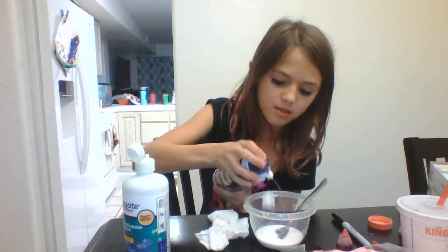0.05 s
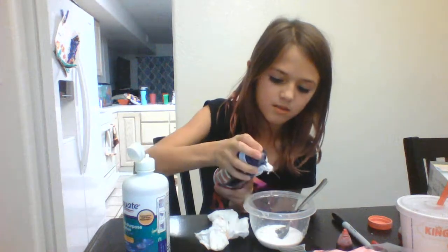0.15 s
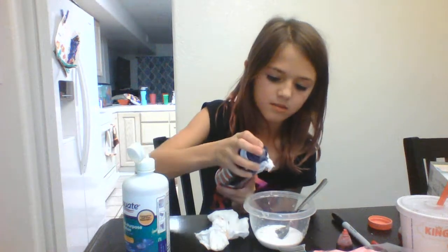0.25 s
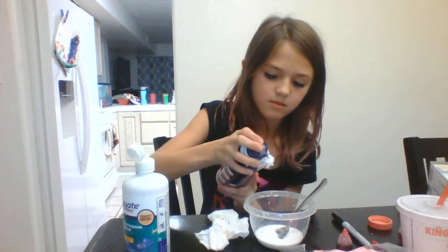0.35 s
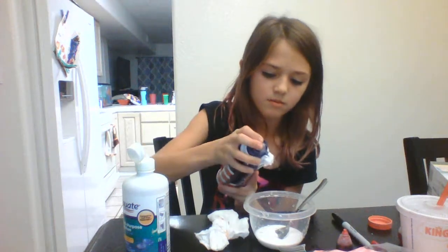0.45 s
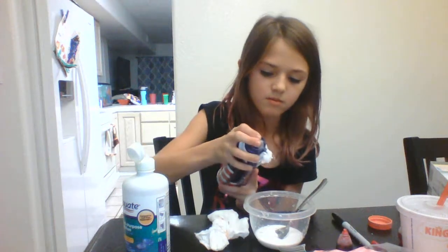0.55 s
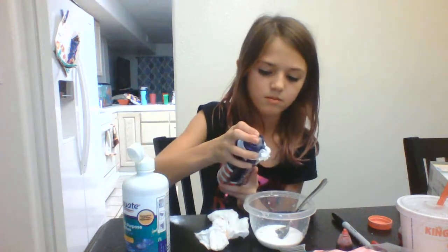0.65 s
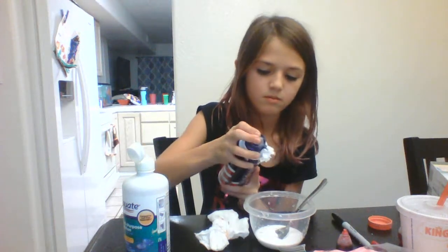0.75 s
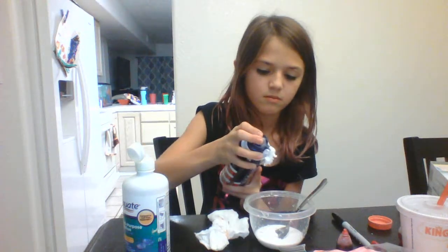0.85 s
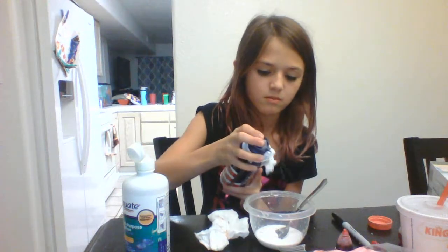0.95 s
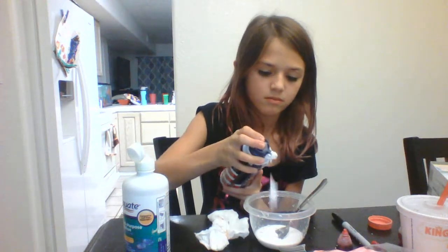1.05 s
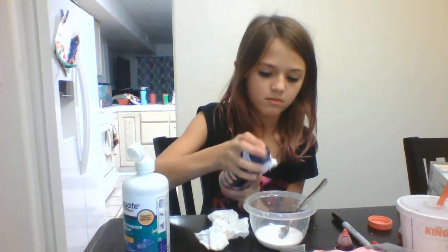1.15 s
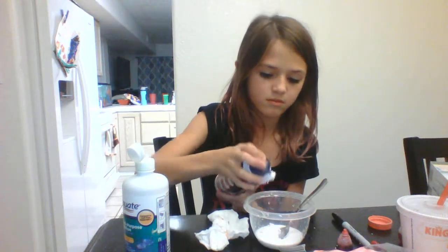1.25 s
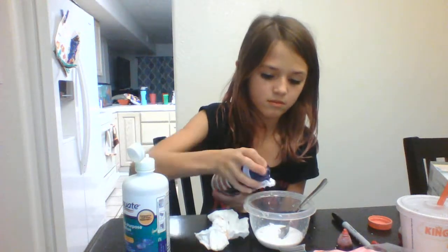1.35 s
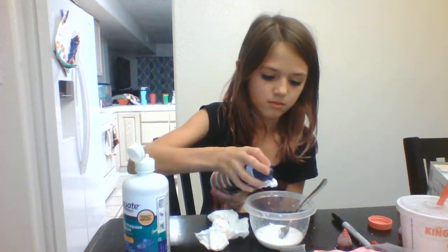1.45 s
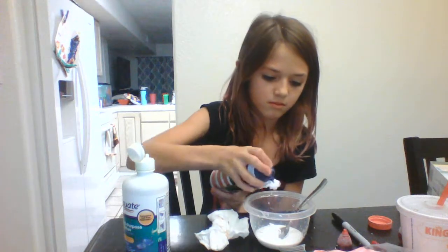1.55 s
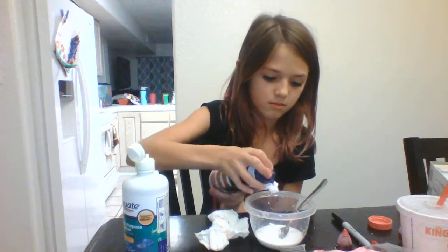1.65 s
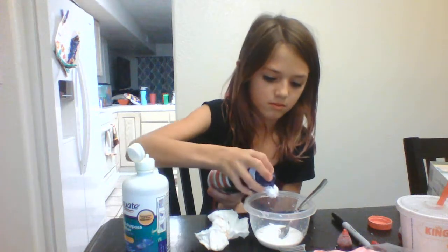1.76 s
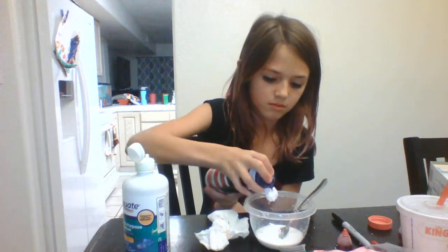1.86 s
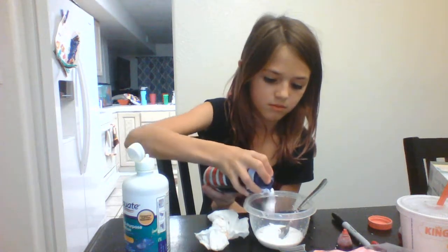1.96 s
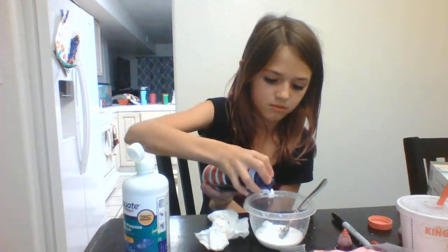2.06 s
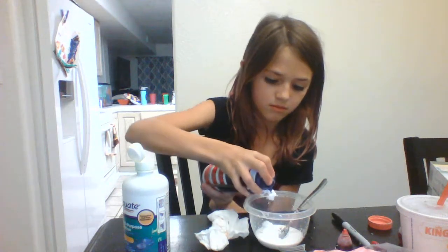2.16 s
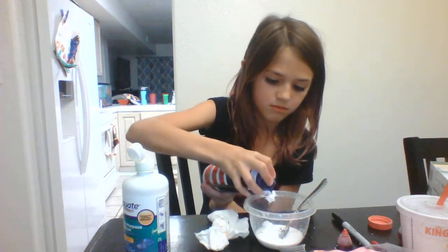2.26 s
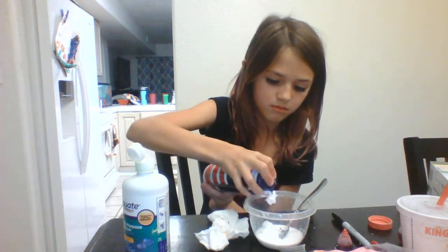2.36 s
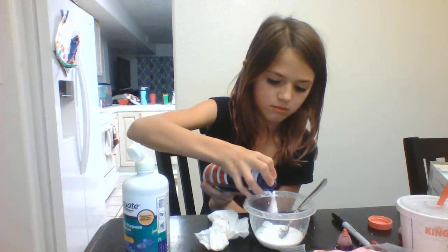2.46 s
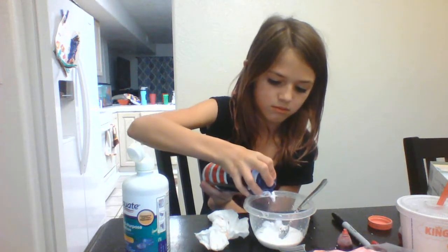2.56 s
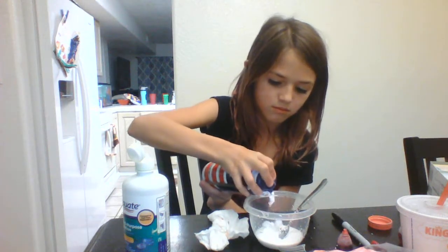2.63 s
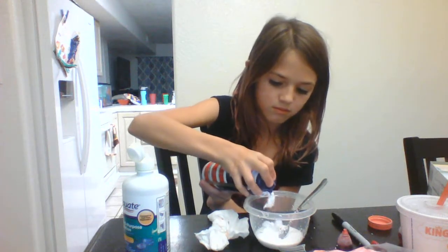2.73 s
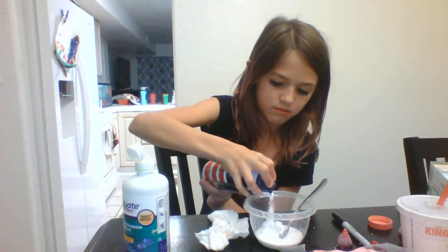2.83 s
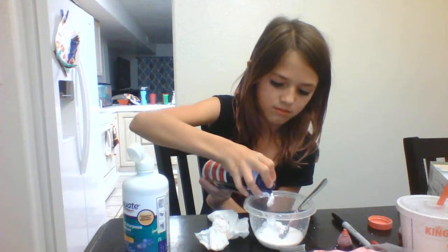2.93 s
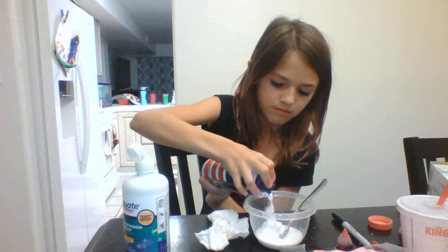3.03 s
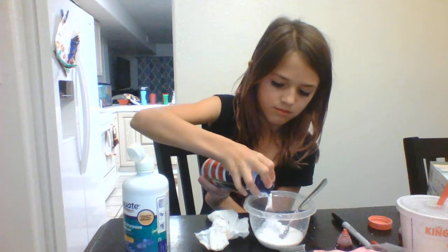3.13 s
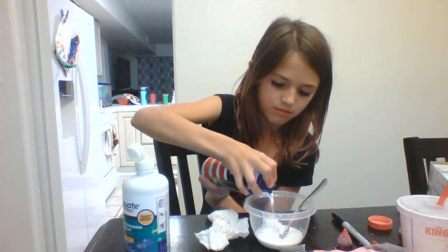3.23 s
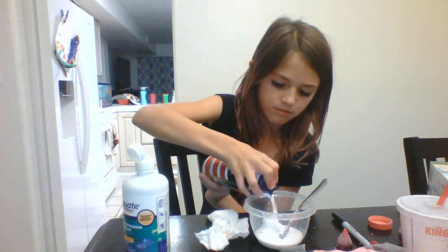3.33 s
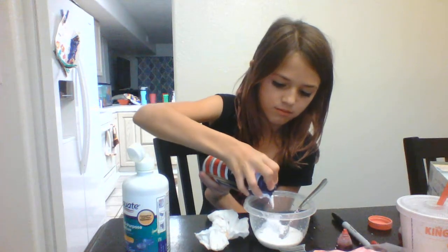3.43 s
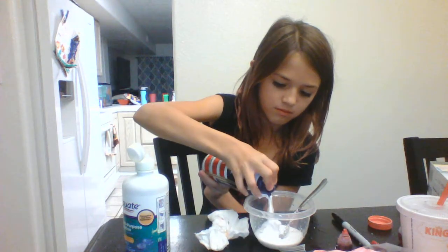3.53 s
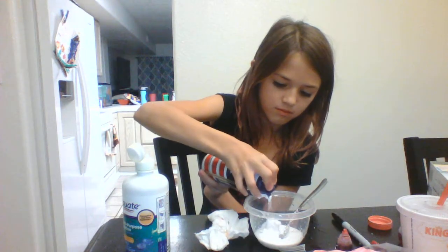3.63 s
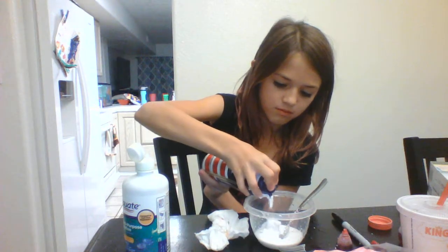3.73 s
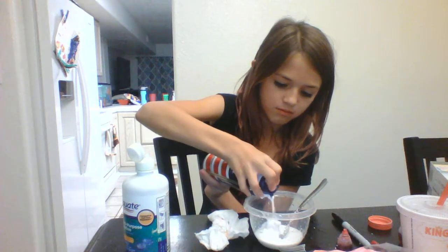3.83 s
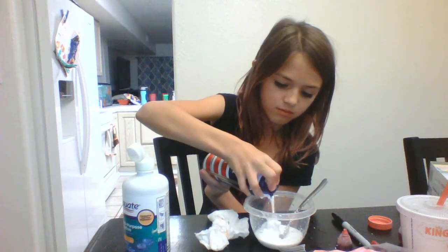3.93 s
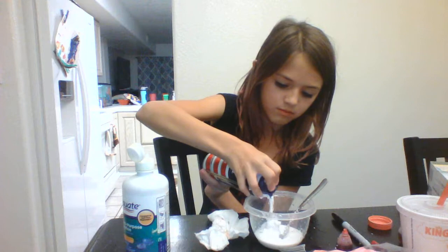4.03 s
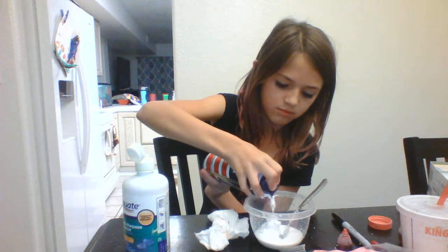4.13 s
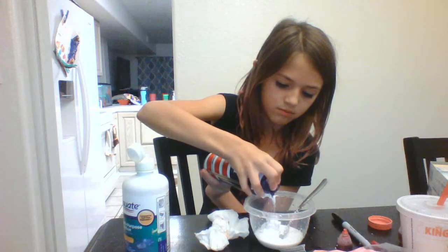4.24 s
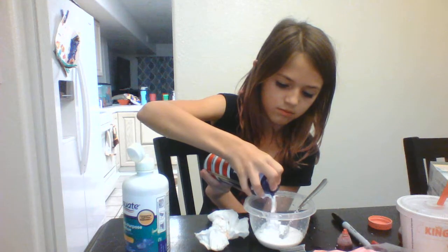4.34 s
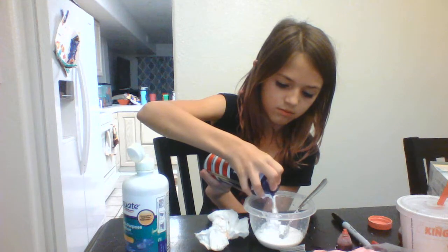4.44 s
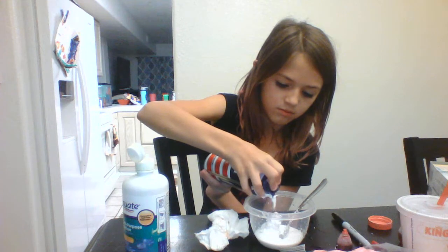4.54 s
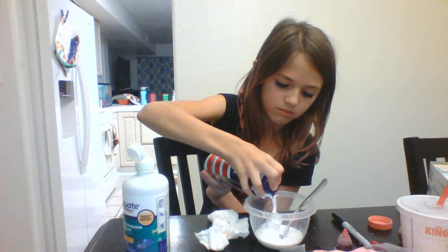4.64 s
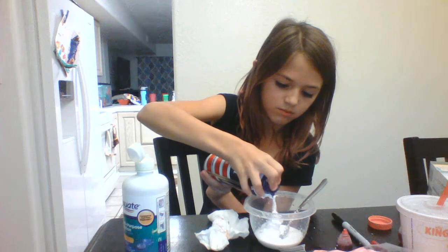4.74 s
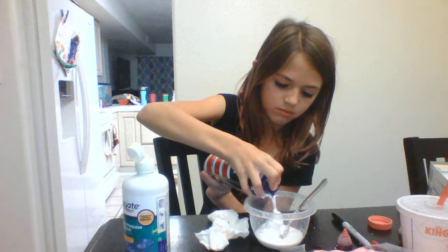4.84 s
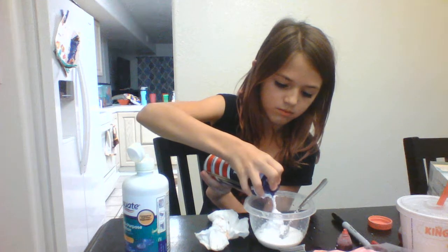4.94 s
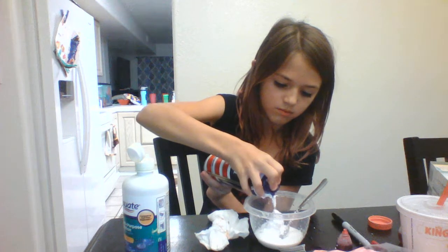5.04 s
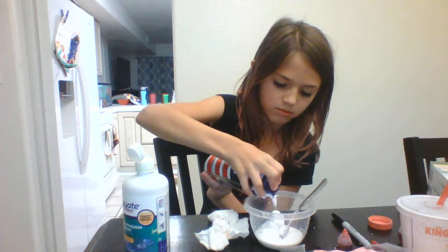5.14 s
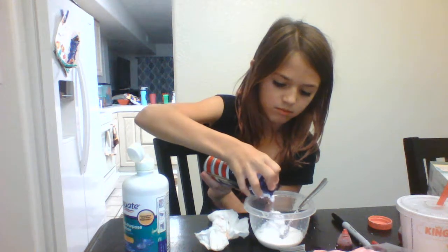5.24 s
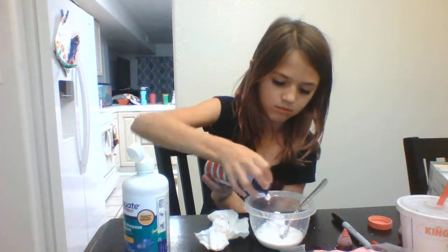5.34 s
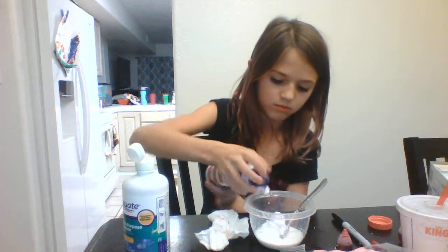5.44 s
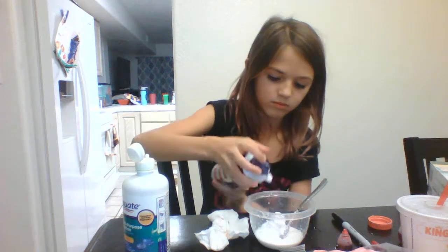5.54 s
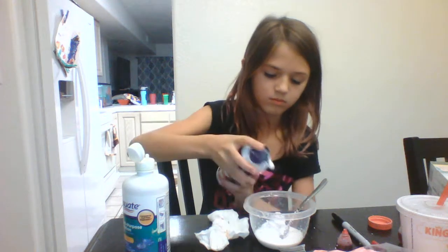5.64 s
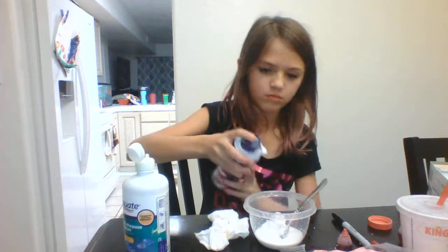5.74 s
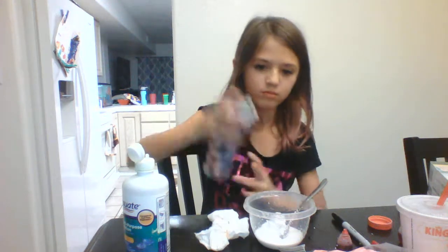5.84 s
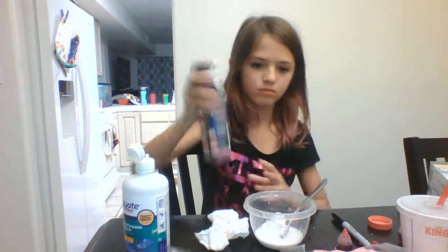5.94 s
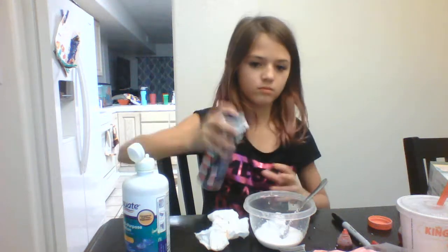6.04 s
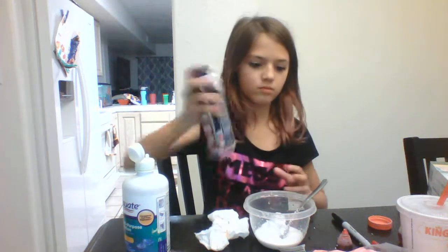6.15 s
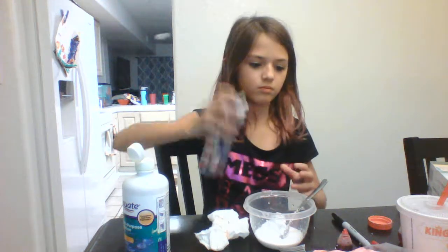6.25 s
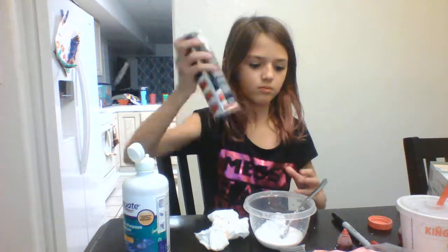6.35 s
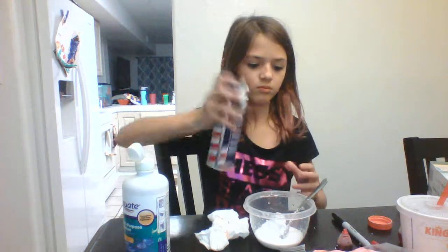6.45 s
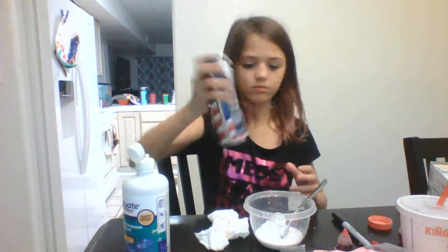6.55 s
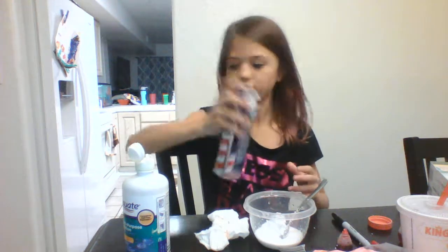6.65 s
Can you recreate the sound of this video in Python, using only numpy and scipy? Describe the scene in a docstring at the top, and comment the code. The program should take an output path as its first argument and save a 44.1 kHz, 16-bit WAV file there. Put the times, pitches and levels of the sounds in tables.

```python
"""A spurt of gas and foam sputters from a can into a plastic bowl and dies away; a second, long one stops short
and rings out in the kitchen. Bursting noise excites the resonances of spout and bowl; pockets of gas pop at their
own pitch and tearing foam spits bright cracks. The table top, near a laptop microphone, sends a close echo whose
notch sinks in the first spurt and rises later as the can is lowered. Appliances hum behind."""
import sys
import numpy as np
from scipy import signal
from scipy.fft import rfft, irfft, next_fast_len
from scipy.io import wavfile
from scipy.ndimage import uniform_filter1d, map_coordinates

SR = 44100
rng = np.random.default_rng(int(sys.argv[2]) if len(sys.argv) > 2 else 0)


def unload_audio(sound):
    """Save the sound as a 16-bit wav file, at the path given as the first command line argument."""
    columns = np.transpose(np.atleast_2d(sound))
    # keep every value between -1 and 1, then stretch to whole-number steps
    steps = np.round(np.clip(columns, -1, 1) * 32767)
    wavfile.write(sys.argv[1], SR, steps.astype(np.int16))


N = 294676
TIME = np.arange(N) / SR


def amp(db):
    """Decibel law: a level in dB becomes an amplitude gain."""
    return 10 ** (np.asarray(db) / 20)


def unit(x):
    """Normalization: the signal is scaled to rms 1."""
    return x / np.sqrt(np.mean(x ** 2) + 1e-20)


def along(points, hz):
    """Interpolation of (Hz, value) points on a logarithmic frequency axis."""
    point_hz, values = np.transpose(points)
    return np.interp(np.log(hz + 1), np.log(point_hz + 1), values)


def curves(rows):
    """Linear interpolation in time: one curve for each column after the time."""
    seconds, *columns = np.transpose(rows)
    return [np.interp(TIME, seconds, column) for column in columns]


def wobble(rate):
    """Band-limited random fluctuation: a smooth curve through rate random knots a second."""
    return map_coordinates(rng.standard_normal(N // 20), [TIME * rate])


def filtered(x, response):
    """Linear filtering: the spectrum of x times a complex response of frequency."""
    size = next_fast_len(N + SR // 2)
    spectrum = rfft(x, size) * response(np.fft.rfftfreq(size, 1 / SR))
    return irfft(spectrum, size)[..., :N]


def modes(table):
    """Modal superposition: damped resonances of alternating sign add up."""
    def response(f):
        total = 0
        for k, (centre, width, db) in enumerate(table):
            damping = 1j * f * width
            total = total + (-1) ** k * amp(db) * damping / (centre * centre - f * f + damping)
        return total
    return response


def steep(table):
    """Cascaded resonators: the modal response squared, so its skirts are steeper and its dB doubled."""
    return lambda f: modes(table)(f) ** 2


def bursts(fast_db, slow_db):
    """Intermittent flow: level in dB of millisecond bursts in clumps, saturating at 11 dB."""
    level_db = fast_db * wobble(450) + slow_db * (wobble(120) + 0.53 * wobble(40))
    return 11 * np.tanh(level_db / 11)


# the gas flow, one table per spurt: start_s, flow_db, foam (0-1, foam in the spout),
# lean_db (upper whistle over lower), mids_db, treble_db
SPURTS = [
    [(0.0, -33.5, 0.16, -10, -4, 2), (.15, -40.5, 0.03, -12.5, -2.5, 0), (.38, -42.5, 0, -12.5, -2, 1.5),
     (.62, -45, 0, -2, 0.5, -1.5), (.73, -40, .1, 17, -5, 2.5), (.8, -46.5, 0.14, 10, 0, 3.5),
     (1.14, -49.5, 0.05, -0.5, -4, 3), (1.24, -55, 0.11, -1, 1.5, 8), (1.47, -51.5, 0.16, -1, 2, 2)],
    [(1.49, -55, 0.3, 0, 7, 2), (1.5, -41.5, 0.34, 5, 0, -5), (1.59, -35, 0.06, 2.5, -2, 3),
     (1.74, -35, 0.55, -9, 3, -0.5), (1.8, -32, 0.33, -13.5, 2.5, -4), (1.96, -32, 0.6, -12, -2.5, -3),
     (2.16, -33, 0.43, -8, 1.5, 1), (2.4, -33.5, 0.63, -2.5, 1.5, -3), (2.6, -28, 0.75, 2, 1.5, 0),
     (2.75, -27.5, .9, -2.5, 3, -1), (2.9, -28.5, .9, -1, 1, 4.5), (3.15, -25.5, 0.92, -3.5, 2, -2),
     (3.35, -28, 1, 0, 0.5, 4.5), (3.55, -28.5, .9, -1.5, 0, -1), (3.85, -30, 0.75, 5, -0.5, 6.5),
     (4.1, -26, 0.8, 1, -6, 0), (4.3, -28.5, 0.86, 3, -1.5, -3), (4.55, -29, 0.78, 1.5, -0.5, 0.5),
     (4.8, -29, 0.71, 0.5, -3, 1.5), (5.05, -30.5, 0.67, 9.5, 0.5, 3.5), (5.22, -32.5, 0.82, -0.5, -2.5, 4)],
]
# how the flow divides among the sounds: clear_db (spout clear), foam_db (spout full of foam), re the flow
FLOW_SHARE = {"bowl": (-10.5, -13.5), "hollow": (-2, -22.5), "spout": (-5.5, -15), "lower": (-10.5, -4.5),
              "upper": (-13, -5), "fizz": (-22.5, -16), "air": (-27.5, -21.5)}
# resonances: centre_hz, width_hz, level_db (all but the bowl's are squared in steep)
HOLLOW_MODES = [(1667, 420, 0.5), (1990, 230, 2.5), (2500, 250, -3), (3650, 350, -0.5), (5750, 350, -4),
                (6380, 300, -6.5)]
SPOUT_MODES = [(2080, 170, 1), (2442, 320, 2), (2676, 357, 1), (3265, 250, -0.5)]
LOWER_WHISTLE = [(3663, 460, -4), (4282, 330, 4.5), (4720, 350, -0.5)]
UPPER_WHISTLE = [(5107, 560, 15), (6000, 410, 3.2)]
BOWL_MODES = [(316, 300, -5.5), (732, 92, 3), (1019, 179, 4.5), (1329, 226, 0)]
FIZZ_MODES = [(5850, 565, 0.6), (7480, 1300, 1), (9250, 690, -1)]
# spectral shape of the airy hiss: pitch_hz, relative density_db (per Hz)
AIR_SHAPE = [(6000, -42), (9500, -8), (10500, -3.5), (12100, -8), (13000, -11.5), (14500, -11),
             (15700, -21)]
# uneven flow: shared by the surging resonances, and each one's own
SURGE_DB, OWN_SURGE_DB, SURGES_PER_S = 0.7, 1.2, 11
VALVE_SHUTS_S, CLOSING_DB_PER_S = 5.205, 244.5


def sputter():
    """Resonance under turbulent excitation: partly common bursts drive all modes; foam damps the hollow ones."""
    flow_db, foam, lean_db, mids_db, treble_db = curves(np.vstack(SPURTS))
    common_db = bursts(fast_db=7.5, slow_db=2.0)
    shared_db = flow_db + SURGE_DB * wobble(SURGES_PER_S)

    def share_db(name):
        clear_db, foam_db = FLOW_SHARE[name]
        return clear_db + foam * (foam_db - clear_db)

    def jet(common_part, own_db):
        level_db = common_part * common_db + bursts(own_db, 0.5 * own_db)
        return amp(level_db) * rng.standard_normal(N)

    def gain(db, hz):
        return amp(db + shared_db + OWN_SURGE_DB * wobble(SURGES_PER_S)) + rush(hz)

    hollow = unit(filtered(jet(0.8, 2.1), steep(HOLLOW_MODES)))
    spout = unit(filtered(jet(0.59, 4.0), steep(SPOUT_MODES)))
    lower = unit(filtered(jet(0.906, 3.7), steep(LOWER_WHISTLE)))
    upper = unit(filtered(jet(1.0, 3.5), steep(UPPER_WHISTLE)))
    surging = gain(share_db("hollow"), 2070) * hollow
    surging += gain(share_db("spout") + mids_db, 3030) * spout
    surging += gain(NOZZLE_DB, NOZZLE_HZ) * nozzle(jet)
    surging += gain(share_db("lower") - lean_db / 2, 4350) * lower
    surging += gain(share_db("upper") + lean_db / 2, 5210) * upper

    flicker_db = treble_db + 2.5 * wobble(14)
    bowl = unit(filtered(jet(0.65, 1.5), modes(BOWL_MODES)))
    fizz = unit(filtered(jet(0.419, 6.9), steep(FIZZ_MODES)))
    air = unit(filtered(jet(0.5, 8.6), lambda f: amp(along(AIR_SHAPE, f))))
    even = amp(share_db("bowl") + 0.6 * mids_db) * bowl
    even += amp(share_db("fizz") + flicker_db) * fizz
    even += amp(share_db("air") + 0.8 * flicker_db) * air

    closing = amp(-CLOSING_DB_PER_S * np.clip(TIME - VALVE_SHUTS_S, 0, None))
    return closing * (surging + amp(flow_db) * even)


# spectral shape of rumble and hiss: pitch_hz, relative density_db (per Hz)
FLOOR_SHAPE = [(20, -37), (45, -27), (70, -31), (100, -11), (140, -9.5), (330, -15.5), (390, -17),
               (520, -25.5), (750, -24.5), (850, -35), (1250, -35.5), (1800, -30.5), (2400, -36.5),
               (2900, -40.5), (3700, -36.5), (9000, -36), (15800, -35)]
# hum lines: pitch_hz, drift_hz, waver_db, level_db (at mid-scene, before the waver)
HUM_LINES = [(59.4, 4.4, 2.8, -71), (88.4, 3, 2.5, -58), (109.7, 3.6, 2.8, -63.5), (209, 3, 3, -65.5),
             (289.6, 2.7, 2.8, -69.5), (353, 1.7, 2.5, -60.5), (420, 2.2, 2.5, -73.5), (737, .3, 0.3, -71),
             (14730, 1.2, 2, -84)]
# swells of a faint tone: middle_s, length_s, level_db
TONE_SWELLS = [(1.67, .2, -56), (2.3, 0.15, -73), (3.62, 0.096, -53), (3.976, 0.12, -60),
               (4.24, .25, -54.5), (5.12, 0.34, -47), (5.77, 0.073, -60), (5.95, 0.15, -58.5),
               (6.198, .2, -59), (6.593, 0.086, -60.5)]
FLOOR_DB, HUM_GROWS_DB_PER_S = -57.5, 0.13
SWELL_HZ, SWELL_DRIFT_HZ, SWELL_REST_DB = 243.3, 2.5, -69.5


def background():
    """Stationary noise plus tonal lines: appliance rumble, microphone hiss and hums that waver a little."""
    def line(hz, drift_hz, waver_db):
        cycles = np.cumsum(hz + drift_hz * wobble(8.2)) / SR
        return amp(waver_db * wobble(15)) * np.sin(2 * np.pi * cycles)

    noise = filtered(rng.standard_normal(N), lambda f: amp(along(FLOOR_SHAPE, f)))
    hum = sum(amp(db) * line(hz, drift_hz, waver_db) for hz, drift_hz, waver_db, db in HUM_LINES)
    growth = amp(HUM_GROWS_DB_PER_S * (TIME - TIME.mean()))
    swell = amp(SWELL_REST_DB)
    for middle, length, db in TONE_SWELLS:
        swell = swell + amp(db) * np.exp(-(2 * (TIME - middle) / length) ** 2)
    tone = swell * line(SWELL_HZ, SWELL_DRIFT_HZ, waver_db=2.4)
    return amp(FLOOR_DB) * unit(noise) + growth * hum + tone


# the loudest bursts: start_s, level_db (envelope peak), pitch_hz
GAS_POPS = [(0.0028, -28, 2210), (0.008, -36, 4480), (0.0217, -35, 4590), (0.03, -22, 4240),
            (0.0484, -38, 4430), (0.0614, -32.5, 2290), (0.1007, -30.5, 2240), (0.1113, -28.5, 1960),
            (0.1252, -31.5, 2100), (0.1448, -31, 2170), (0.1934, -26, 1820), (0.2175, -26.5, 2250),
            (0.3114, -30, 2000), (0.3578, -30, 2380), (0.3641, -29, 2030), (0.3701, -32, 2090),
            (0.3742, -30, 2020), (0.4812, -27.4, 1980), (0.5138, -34, 2090), (0.6377, -32, 2000),
            (0.6921, -39, 2150), (0.7146, -27.5, 2150), (0.7465, -30, 2230), (0.9128, -37, 1940),
            (0.9433, -37.5, 1930), (1.0516, -34, 1820), (1.125, -38.5, 1990), (1.3386, -43, 1990),
            (1.5149, -32, 4830), (1.5199, -32.5, 4810), (1.5481, -29.5, 4830), (1.6968, -25, 4380),
            (1.7601, -14.5, 4350), (1.7655, -18, 4430), (1.7917, -16.5, 4310), (1.93, -14.5, 4940),
            (1.9347, -24.5, 4920), (1.9389, -21, 5120), (1.9514, -16.5, 4790), (1.9556, -20.5, 4930),
            (2.0174, -21, 4360), (2.1858, -10, 4430), (2.2099, -18, 5280), (2.2192, -17.5, 5160),
            (2.2278, -23.5, 5180), (2.2468, -19, 5020), (2.3277, -16.5, 4950), (2.4098, -19, 4890),
            (2.4555, -20.5, 4720), (2.5305, -24.5, 5250), (2.5373, -22, 4320), (2.5622, -19.5, 4300),
            (2.6275, -16, 5190), (2.7266, -15, 4340), (2.7343, -12.5, 5200), (2.7774, -11, 4410),
            (2.7889, -15, 4820), (2.833, -19.5, 4340), (2.8492, -14.5, 4470), (2.8986, -12.5, 5260),
            (2.9897, -11, 4770), (3.062, -14, 5180), (3.072, -18, 4360), (3.0883, -14, 4830),
            (3.1008, -16.5, 4440), (3.1139, -11, 4450), (3.1441, -13, 4310), (3.1557, -14.5, 4450),
            (3.2116, -19, 5200), (3.248, -14, 4730), (3.2548, -12, 4710), (3.2744, -15, 4450),
            (3.3052, -10.5, 5000), (3.3228, -14, 5450), (3.3269, -18, 5440), (3.341, -19, 5340),
            (3.3468, -22, 5530), (3.3803, -19, 4360), (3.4134, -21.5, 5040), (3.4811, -17, 5310),
            (3.486, -16.5, 5450), (3.5152, -10.5, 4830), (3.5197, -18.5, 5340), (3.5374, -14.4, 5180),
            (3.5796, -14, 5310), (3.586, -18.9, 5500), (3.7102, -18, 5250), (3.7512, -18.5, 5560),
            (3.8016, -20.5, 5340), (3.8783, -15.5, 5100), (3.8841, -16.8, 5360), (3.8893, -14, 5210),
            (3.9405, -12, 4350), (3.9639, -14, 5250), (3.9815, -15.5, 5500), (3.9942, -17.5, 5510),
            (4.0322, -17, 4300), (4.0695, -19.5, 5280), (4.1076, -15, 5330), (4.1183, -14.1, 4520),
            (4.122, -16, 4590), (4.1306, -19, 5290), (4.1341, -18, 4800), (4.1388, -18.5, 5090),
            (4.2918, -10, 5170), (4.3049, -17, 5210), (4.324, -19.5, 5310), (4.3277, -19.5, 5320),
            (4.3399, -18, 5210), (4.3833, -16, 5430), (4.389, -19, 5210), (4.4224, -21.5, 5400),
            (4.4267, -24, 5250), (4.4917, -21.5, 5100), (4.5273, -15.5, 5160), (4.5677, -11.5, 5110),
            (4.5728, -15, 4900), (4.5767, -14, 5180), (4.5844, -17.5, 5520), (4.7019, -16, 5140),
            (4.7078, -18, 5470), (4.7123, -16, 5370), (4.8037, -17, 5200), (4.8071, -17, 5200),
            (4.8484, -22.5, 5400), (4.9388, -18.5, 5210), (4.9454, -23.5, 5390), (4.9666, -23.5, 5210),
            (5.0532, -23, 5350), (5.1157, -16, 5050), (5.1464, -16, 5100), (5.166, -18, 4810),
            (5.1714, -10, 4890), (5.1918, -20.5, 5150)]


def pops():
    """Transient oscillation: each big pocket of gas rings a few cycles at its pitch, longer when low."""
    out, t = np.zeros(N + 999), np.arange(700) / SR
    phases = rng.uniform(0, 2 * np.pi, len(GAS_POPS))
    for (start, db, hz), phase in zip(GAS_POPS, phases):
        u = t / (0.00095 * (5000 / hz) ** 0.5)  # time over the envelope's rise time
        envelope = u ** 2 * np.exp(2 - 2 * u)
        out[round(start * SR):][:len(t)] += amp(db) * envelope * np.sin(2 * np.pi * hz * t + phase)
    return out[:N]


RUSH_DB, RUSH_S = -16.5, 0.02  # gas after a burst: level re its peak, time to die to about a third
REACH = 0.14  # how far in log pitch a burst stirs a resonance


def rush(hz):
    """Exponential relaxation: a big burst clears a path, and the resonance near its pitch jumps and settles."""
    start, db, pitch = np.transpose(GAS_POPS)
    near = np.exp(-(np.log(pitch / hz) / REACH) ** 2)
    kicks = np.bincount(np.round(start * SR).astype(int), near * amp(db + RUSH_DB), N)
    return signal.fftconvolve(kicks, np.exp(-TIME[:SR // 4] / RUSH_S))[:N]


# first notch of the table echo: start_s, pitch_hz
ECHO_NOTCH = [(0, 1355), (.8, 1060), (1.2, 1140), (1.5, 1194), (2, 1550), (2.5, 1583), (3.2, 1544),
              (5.3, 1563)]


def table_echo(x):
    """Comb interference: a duller echo half a period of the first notch late joins the direct sound."""
    notch_hz, = curves(ECHO_NOTCH)
    dull = filtered(x, lambda f: 1 / np.sqrt(1 + (f / 3500) ** 2))
    echo = map_coordinates(dull, [np.arange(N) - SR / (2 * notch_hz)])
    return x + 0.72 * echo


# reverberation of the kitchen: pitch_hz, t60_s
KITCHEN_DECAY = [(300, 0.94), (2000, 0.82), (3500, 1), (5000, 0.49), (7000, 0.56), (12000, 0.063)]


def kitchen(x):
    """Diffuse reverberation: noise tails decay at each frequency's own speed, fastest at first."""
    out, step = np.zeros(N + 2 * SR), SR // 3
    for k in range(0, N, step):  # a new tail every third of a second
        hz, t, z = signal.stft(rng.standard_normal(SR * 2 // 3), SR, nperseg=256)
        late = amp(-60 * t / along(KITCHEN_DECAY, hz)[:, None])
        early = 2.6 * amp(-60 * t / 0.041)
        tail = signal.istft(z * (late + early), SR, nperseg=256)[1]
        wet = signal.fftconvolve(x[k:k + step], tail / np.linalg.norm(tail))
        out[k + 150:][:len(wet)] += wet
    return out[:N]


# bright spits of foam: start_s, level_db (envelope peak before noise and high-pass), pitch_hz (band centre)
FOAM_SPITS = [(0.0299, -39, 7960), (0.0637, -41, 8660), (0.0765, -42, 8680), (0.1733, -45, 7330),
              (1.3381, -51, 6610), (1.5142, -41, 6710), (1.6601, -40, 6710), (1.6965, -40, 6710),
              (1.7919, -41, 8970), (1.9834, -33.5, 7170), (1.9906, -36.5, 6710), (2.1954, -38, 6710),
              (2.2191, -36, 6790), (2.33, -36.5, 8820), (2.3579, -37, 14090), (2.5066, -37, 10870),
              (2.6353, -32.5, 7300), (2.6445, -32.5, 7270), (2.6515, -32, 7700), (2.6857, -29, 9110),
              (2.6919, -28, 8910), (2.8527, -19.5, 7160), (2.8632, -20, 7040), (2.8742, -23, 8910),
              (2.901, -22, 8800), (3.0097, -29, 8620), (3.1687, -28, 8300), (3.1748, -26, 7460),
              (3.2555, -28, 7380), (3.2739, -27, 9080), (3.3256, -20, 9000), (3.3471, -30, 11920),
              (3.3571, -28, 8890), (3.5412, -30, 9160), (3.6063, -24.5, 10850), (3.776, -26, 8730),
              (3.8108, -23, 8890), (3.8215, -25, 9150), (3.8414, -30, 11840), (3.9413, -24, 8930),
              (3.9855, -28, 8620), (4.0848, -30, 7440), (4.1477, -29.5, 10220), (4.1993, -31.5, 9070),
              (4.2686, -33, 11830), (4.3991, -30, 7630), (4.4387, -29.5, 9250), (4.5177, -28, 8830),
              (4.5777, -31, 9270), (4.6328, -28, 8820), (4.6518, -27, 8830), (4.7367, -29.5, 9150),
              (4.7733, -31, 8890), (4.8088, -31, 9090), (4.8634, -29, 9010), (4.893, -30, 8970),
              (4.9742, -31.5, 10170), (5.043, -25, 7440), (5.075, -29.5, 9120), (5.0819, -29, 7500),
              (5.1714, -29.5, 9130), (5.209, -30, 7200)]


def spits():
    """Amplitude modulation: foam tearing at the lip cracks as a noise band around its own pitch."""
    out, t = np.zeros(N + 999), np.arange(300) / SR
    u = t / 0.0008  # time over the envelope's rise time
    noises = rng.standard_normal((len(FOAM_SPITS), len(u)))
    for (start, db, hz), noise in zip(FOAM_SPITS, noises):
        crack = np.sin(2 * np.pi * hz * t) * (1 + 2.5 * uniform_filter1d(noise, size=7))
        out[round(start * SR):][:len(u)] += amp(db) * u * np.exp(1 - u) * crack
    return filtered(out[:N], lambda f: (1j * f / 6500) ** 2 / (1 + 1j * f / 6500) ** 2)


# a narrow whistle sets in once foam narrows the nozzle, and sinks as it goes on; level re the flow
NOZZLE_S, NOZZLE_HZ, NOZZLE_SAG_HZ_PER_S = 2.95, 2263, 75
NOZZLE_HALF_WIDTH_HZ, NOZZLE_DB = 51, -15


def nozzle(jet):
    """Heterodyning: slow noise from the jet modulates a sinking carrier into a narrow whistling band."""
    since = TIME - NOZZLE_S
    cycles = np.cumsum(NOZZLE_HZ - NOZZLE_SAG_HZ_PER_S * since) / SR
    carrier = np.exp(2j * np.pi * cycles)
    real, imaginary = (filtered(jet(0.6, 3.5), lambda f: 1 / (1 + 1j * f / NOZZLE_HALF_WIDTH_HZ))
                       for _ in range(2))
    band = (carrier * (real + 1j * imaginary)).real
    return np.clip(since / 0.08, 0, 1) * unit(band)


def scene():
    """Superposition: the can with its table echo, the reverberant kitchen and the background add up."""
    spray = sputter() + pops() + spits()
    can = filtered(spray, lambda f: (1j * f / (150 + 1j * f)) ** 2)  # a small spout sends out no bass
    return (table_echo(can) + amp(-11.5) * kitchen(can) + background())[None]


TOP_HZ = 15800


def record(dry):
    """Band limitation: the recorder keeps nothing above its top frequency."""
    return filtered(dry, lambda hz: hz < TOP_HZ)


dry = scene()
out = record(dry)
unload_audio(out)
```